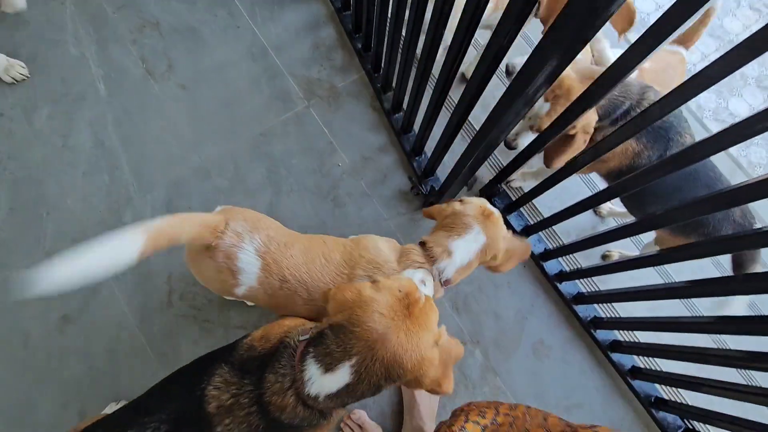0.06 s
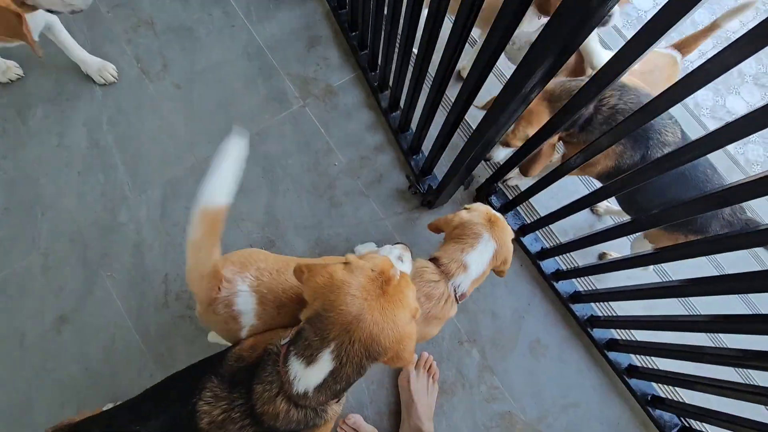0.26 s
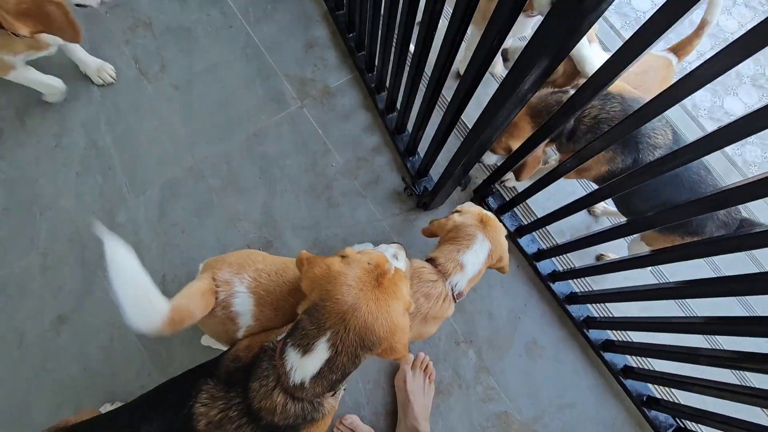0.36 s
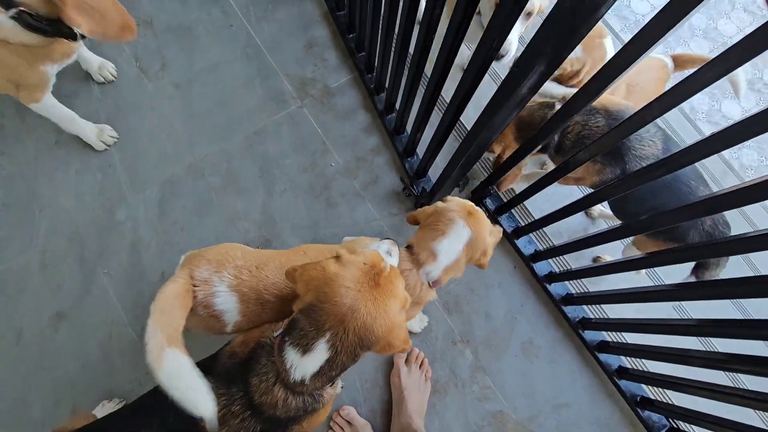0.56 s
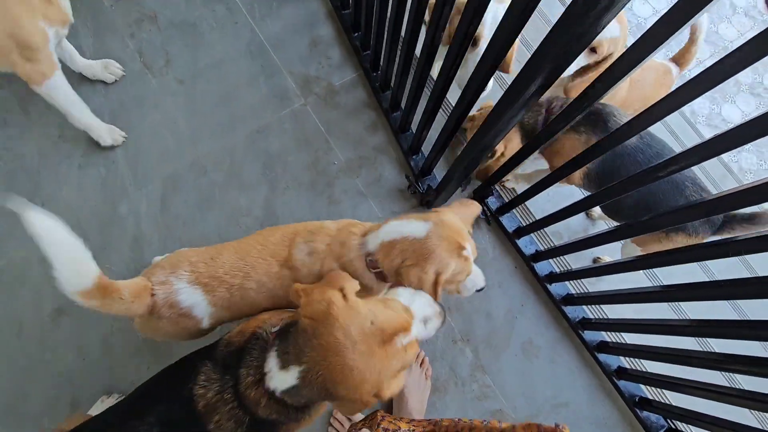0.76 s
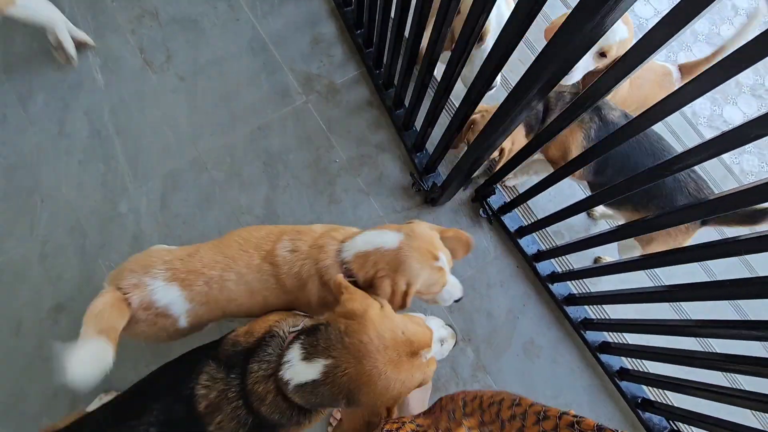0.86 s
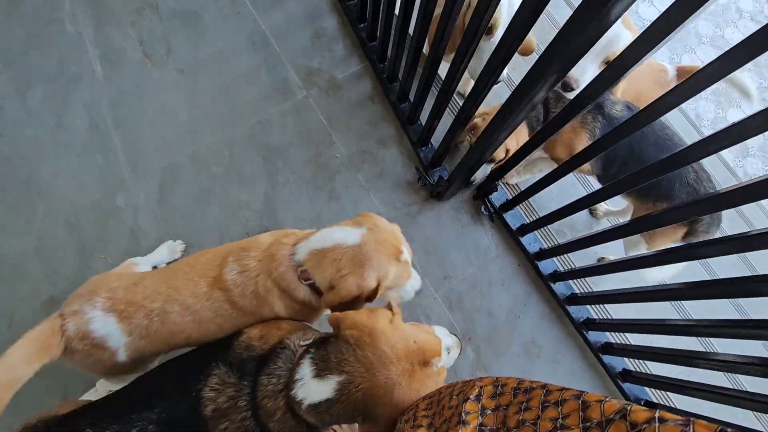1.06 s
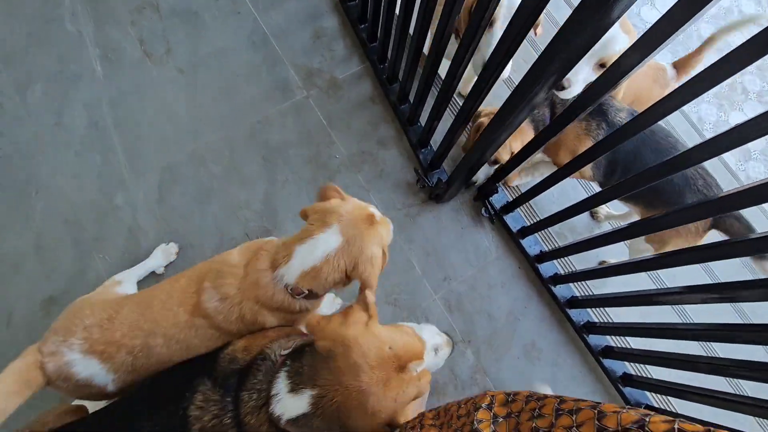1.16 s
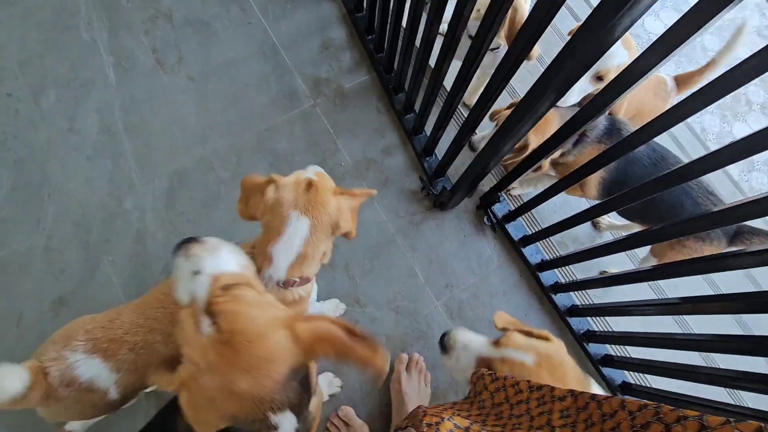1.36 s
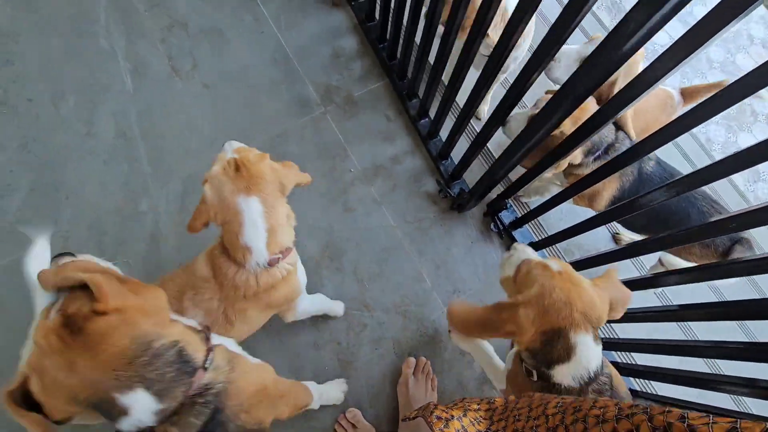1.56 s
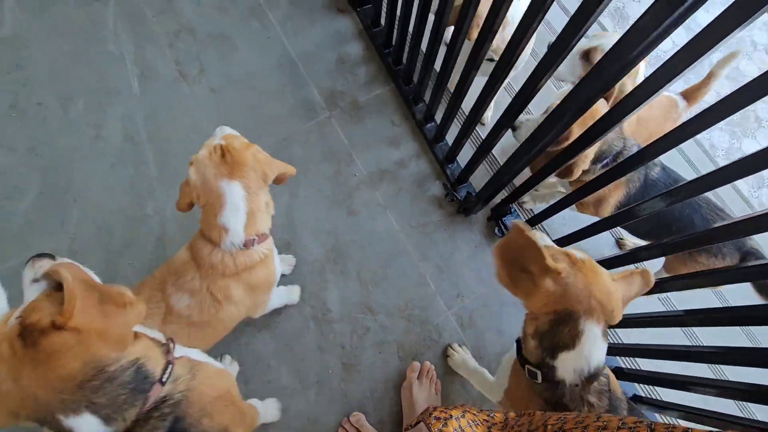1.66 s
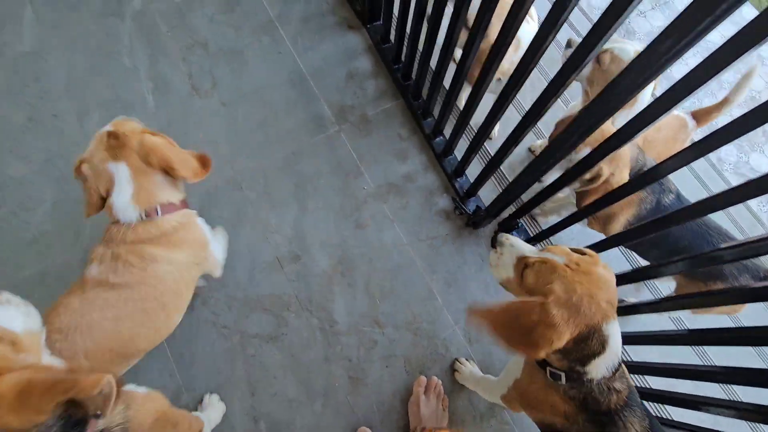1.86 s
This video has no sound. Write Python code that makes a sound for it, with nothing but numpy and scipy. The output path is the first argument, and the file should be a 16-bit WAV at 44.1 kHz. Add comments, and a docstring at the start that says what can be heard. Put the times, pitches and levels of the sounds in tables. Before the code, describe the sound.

Dogs bark twice and break into a long, high, falling howl on an echoing balcony

```python
"""Beagles crowd at a steel railing on a hard-walled balcony, close below the microphone.
A harsh bark topped by a yip, low grumbles and a second bark clearing into a hoot lead to a cracking howl and a yelp.
Each call is a stack of unsteady harmonics plus puffs of breath, coloured by a throat curve.
Claws are short noise bursts, paw thuds and railing bars are damped sines, and the air is steady noise.
The walls answer with decaying noise that differs between left and right."""
import sys
import numpy as np
from scipy import signal
from scipy.fft import rfft, irfft, next_fast_len
from scipy.io import wavfile
from scipy.ndimage import uniform_filter1d, minimum_filter1d, map_coordinates

SR = 44100
rng = np.random.default_rng(int(sys.argv[2]) if len(sys.argv) > 2 else 0)


def digitize_waveform(pressure):
    """Quantize a signal to 16-bit integers and store it at the path in sys.argv[1].

    Rows of a 2-D input are taken as channels; values are limited to [-1, 1].
    """
    field = np.atleast_2d(pressure).T
    bounded = np.clip(field, -1, 1)
    quanta = np.round(bounded * 32767).astype(np.int16)
    wavfile.write(sys.argv[1], SR, quanta)


N = 83790

# Source levels are ahead of the wall mix; colour curves are relative; roughness above 1 counts as 1.
# claw scuffs: start_s, level_db, t60_s
SCUFFS = [(.002, -32, 0.27), (1.189, -39, 0.097), (1.37, -32, 0.07), (1.763, -39, 0.14), (1.874, -35, 0.33)]
# tone of the scuffs: freq_hz, gain_db
SCUFF_COLOUR = [(100, -10.5), (1200, -3.5), (2000, 6.5), (3000, -6.5), (9000, -16), (15000, -24)]
# sharp claw clicks on the floor: start_s, level_db, t60_s
CLICKS = [(.115, -27.5, 0.097), (.164, -30.5, 0.14)]
# tone of the clicks: freq_hz, gain_db
CLICK_COLOUR = [(1500, 7), (15000, -13.5)]
# three low grumbles, each a contour: time_s, pitch_hz, level_db, roughness_0_to_1
GRUMBLES = [
    [(.02, 273.6, -43.5, 0.6), (.1, 334.5, -36.5, 0.2), (.14, 276, -26, .2)],
    [(.11, 185.3, -44.5, 0), (.15, 190.5, -23, 0.31), (.3, 176.3, -46.5, 0.4)],
    [(.34, 408.8, -50.5, .1), (.4, 284, -46, .05), (.44, 256.5, -32, 0.11), (.485, 215.9, -46, 0.1),
     (.55, 297.3, -30.5, 0.15), (.61, 470, -37, .05)],
]
# throat colour of the grumbles: freq_hz, gain_db
GRUMBLE_THROAT = [(100, -25), (180, 0), (350, -3.5), (600, -12), (1000, -6), (2000, -49.5), (8000, -51)]
# paws landing: start_s, pitch_hz, level_db, t60_s
THUDS = [(.03, 129, -36.5, 0.21), (1.603, 104.5, -32, 0.16)]
# harsh bark, ahead of rattle, sputters and jaw: time_s, pitch_hz, level_db, roughness_0_to_1
BARK = [(.11, 479.5, -35.5, 1.11), (.165, 593.4, -10.5, 0.42), (.2, 605.1, -8, 0.43),
        (.232, 597.7, -9.5, 0.31), (.255, 591.3, -14, 0.6), (.365, 543.2, -25.5, 0.66),
        (.405, 522.2, -41.5, 0.31), (.44, 499, -61.5, 0.1)]
# throat colour of the bark: freq_hz, gain_db
BARK_THROAT = [(120, -31.5), (330, -23.5), (590, 7), (780, -3), (1000, -2.5), (1250, -24.5), (2000, -16),
               (2600, -32), (3400, -44.5), (8000, -54), (15000, -65)]
# sputters as the bark runs out of air: centre_s, boost_db
SPUTTERS = [(0.272, 9), (0.291, 8.5), (0.359, 8.5)]
# short high yip over the start of the bark: time_s, pitch_hz, level_db, roughness_0_to_1
YIP = [(.122, 1188, -29.5, 0.24), (.16, 1246, -14.5, 0.14), (.2, 1325, -24, 0.3)]
# second bark that clears into a hoot: time_s, pitch_hz, level_db, roughness_0_to_1
HOOT = [(.51, 532.5, -66, .9), (.54, 561, -22, 0.23), (.568, 572, -18, 0.91), (.615, 590, -9.5, .01),
        (.65, 593.4, -11.5, 0.02), (.69, 584.5, -33, 0.03), (.702, 565.9, -21, .02), (.732, 557.1, -18, 0),
        (.765, 536, -60, 0.2)]
# throat colour of the hoot: freq_hz, gain_db
HOOT_THROAT = [(150, -52), (400, -18.5), (590, 1.5), (730, -17), (900, -4.5), (1130, -28.5), (1550, -29),
               (1780, -11.5), (2050, -25.5), (2800, -47.5), (7500, -48.5), (15000, -55)]
# thin nasal squeak as the howl starts: time_s, pitch_hz, level_db, roughness_0_to_1
SQUEAK = [(.79, 5060, -74, 0.08), (.805, 5950, -38.5, 0), (.83, 6190, -63, 0.06)]
# nasal colour of the squeak: freq_hz, gain_db
SQUEAK_THROAT = [(3000, -49), (5500, -3), (11000, -13.5)]
# main tone of the howl, ahead of the treble curve: time_s, pitch_hz, level_db, roughness_0_to_1
HOWL = [(.805, 1044, -46, 0.02), (.832, 1201, -14.5, 0.02), (.885, 1235, -11.5, 0.04),
        (.915, 1163, -18, 0.02), (.972, 1354, -19.5, 0), (1.018, 1364, -25, 0.05), (1.036, 1344, -11, 0),
        (1.09, 1330, -16.5, 0.02), (1.13, 1311, -15.5, 0), (1.175, 1278, -12, 0), (1.24, 1270, -11, 0),
        (1.295, 1263, -13, 0), (1.322, 1238, -17.5, 0), (1.335, 1215, -9.5, 0), (1.395, 1195, -9, 0),
        (1.43, 1195, -29, 0.02), (1.483, 1167, -11, .02), (1.57, 1116, -41, 0.03)]
# lower second tone where the howl cracks: time_s, pitch_hz, level_db, roughness_0_to_1
CRACK = [(1.398, 1108, -50.5, 0.13), (1.414, 1082, -19, 0.05), (1.48, 1061, -22, 0.1),
         (1.587, 919.6, -28.5, .12)]
# throat colour of the howl, shared by the yip: freq_hz, gain_db
HOWL_THROAT = [(300, -23.5), (800, -3), (1050, 0), (1380, -1.5), (1500, -25), (2150, 2.5), (2500, -24),
               (2750, -18.5), (3550, -44), (4000, -36), (4950, -56), (5350, -35.5), (5900, -46),
               (8800, -52.5), (10000, -44), (12500, -63.5)]
# rise and fall of the howl's treble and hiss: time_s, gain_db
HOWL_TREBLE = [(0.901, 3.5), (1.111, 5), (1.252, -5), (1.391, 1.5)]
# tone of the howl's breath hiss: freq_hz, gain_db
HISS_COLOUR = [(2500, -33), (4500, -4.5), (15000, -10.5)]
# nudged railing bars: start_s, pitch_hz, level_db, t60_s
BARS = [(.843, 999, -38, 0.94), (1.225, 1041, -41.5, 1)]
# closing yelp: time_s, pitch_hz, level_db, roughness_0_to_1
YELP = [(1.568, 944, -42.5, 0), (1.588, 844.5, -14.5, 0.13), (1.612, 749, -18.5, 0.42),
        (1.635, 701, -30.5, 0.08), (1.67, 690, -59, 0.6)]
# throat colour of the yelp: freq_hz, gain_db
YELP_THROAT = [(100, -15), (350, -26), (600, -19.5), (780, 3.5), (1050, -13), (1500, -24.5), (2200, -33.5),
               (3500, -41), (8000, -44.5), (15000, -48)]
# tone of the outdoor air: freq_hz, gain_db
AIR_COLOUR = [(25, -13), (80, -0.5), (500, -11), (1500, -7), (10000, -26)]
# ring time of the walls: freq_hz, t60_s
WALL_RING = [(150, .42), (600, .36), (3000, 0.4), (10000, 0.49)]
# left-right likeness of wall ring and air: freq_hz, correlation_minus1_to_1
WALL_ALIKE = [(150, 0.95), (350, 0.71), (650, 0.0076), (1200, -0.5), (4000, 0.0048)]

TOP_HZ = 15650  # band limit
FLUTTER_DB, FLUTTER_RATE = 11.5, 13.1  # overtone swells (dB), knots per second
BLUR_RAD, BLUR_RATE = 0.16, 500  # phase scatter per order above the third (radians), knots per second
RELEASE_S = 0.0011  # closing fade of every call
MOUTH_OPEN_S, MOUTH_WIDTH_S = 0.19, 0.048  # the bark is brightest when the jaws are widest
MOUTH_DB, MOUTH_HZ = 13, 1140  # treble boost at the widest point, and where it begins
RATTLE_HZ, RATTLE_DEPTH, RATTLE_SCATTER = 100.18, 0.3, 0.055  # mean rate, gain swing, share of the rate
SPUTTER_S = 0.0062  # from centre to 1/e of the boost in dB
TREBLE_HZ = 3200  # lower edge of the howl's treble
HISS_DB = -42.5  # hiss against the howl's loudness, ahead of the treble curve
SCUFF_RISE_S = 0.00067
AIR_DB = -51
LIMIT, LIMIT_HOLD_S = 0.88, 0.004  # peak ceiling (1 is full scale), gain smoothing time


def amp(db):
    """Decibels to gain."""
    return 10 ** (np.asarray(db) / 20)


def unit(x):
    """Scale to rms 1."""
    return x / np.sqrt(np.mean(x ** 2) + 1e-20)


def along(points, hz):
    """Read a frequency curve on a log axis."""
    f, v = np.transpose(points)
    return np.interp(np.log(hz + 1), np.log(f + 1), v)


def wobble(t, rate):
    """A smooth random curve over the times t, rate knots a second."""
    knots = rng.standard_normal(size=1024)
    return map_coordinates(knots, [(t - t[0]) * rate], order=2, mode="mirror")


def filtered(x, response):
    """Shape x by a response of frequency."""
    m = next_fast_len(x.shape[-1] + SR // 20, True)  # padded so the end does not wrap round
    spectrum = rfft(x, m) * response(np.fft.rfftfreq(m, 1 / SR))
    return irfft(spectrum, m)[..., :x.shape[-1]]


def noise(colour):
    """Coloured noise of rms 1."""
    return unit(filtered(rng.standard_normal(N), lambda hz: amp(along(colour, hz))))


def spread(pair):
    """Mix two unrelated signals into mid and side so that left-right likeness follows WALL_ALIKE."""
    def mid_side_gains(hz):
        turn = np.arccos(np.clip(along(WALL_ALIKE, hz), -1, 1)) / 2
        return np.array([np.cos(turn), np.sin(turn)])

    mid, side = filtered(pair, mid_side_gains)
    return np.array([mid + side, mid - side])


def balcony(x, wet_db, pan_db, lag_ms):
    """Direct sound, lag_ms later and pan_db louder at left than right, plus the decaying ring of the walls."""
    hz, t, bins = signal.stft(rng.standard_normal((2, SR * 3 // 4)), SR, nperseg=256)
    decay = amp(-60 * t / along(WALL_RING, hz)[:, None])
    tail = spread(signal.istft(bins * decay, SR, nperseg=256)[1])
    tail = np.pad(tail, ((0, 0), (150, 0)))  # the first wall answers 150 samples late
    wet = signal.fftconvolve(x[None], tail, axes=1)[:, :N]
    wet *= x.std() / wet.std(axis=1, keepdims=True)
    direct = filtered(x, lambda f: np.exp(np.outer([-1j, 1j], np.pi * f * lag_ms / 1000)))
    mix = (direct + amp(wet_db) * wet) / np.hypot(1, amp(wet_db))
    return mix * amp([[pan_db / 2], [-pan_db / 2]])


def voice(rows, throat, jitter, jitter_rate, shimmer_db, breath):
    """Vocal folds: harmonics on an unsteady pitch and a puff of turbulence each cycle, shaped by the throat."""
    s, *columns = np.transpose(rows)
    start, end = np.clip([int(s[0] * SR), int(s[-1] * SR)], 0, N)
    t = np.arange(start, end) / SR
    pitch, level, rough = [np.interp(t, s, column) for column in columns]
    rough = np.clip(rough, 0, 1)
    pitch = pitch * (1 + jitter * np.sqrt(rough) * wobble(t, jitter_rate))
    phase = 2 * np.pi * np.cumsum(pitch) / SR

    # each overtone swells on its own, and the higher ones are fuzzier
    orders = np.arange(1, 13)[:, None]
    flutter = np.array([wobble(t, FLUTTER_RATE) for _ in orders]) * (1 - 1 / orders) ** 4
    blur = np.array([wobble(t, BLUR_RATE) for _ in orders]) * np.maximum(orders - 3, 0)
    gains = amp(along(throat, orders * pitch) + FLUTTER_DB * flutter)
    gains = gains * (orders * pitch < TOP_HZ)
    tone = (gains * np.sin(orders * phase + BLUR_RAD * blur)).sum(0)
    tone = tone / np.sqrt((gains ** 2).sum(0) / 2)  # steady power

    turbulence = rng.standard_normal(N)[start:end] * (1 + np.cos(phase)) ** 2
    puffs = unit(filtered(turbulence, lambda hz: amp(along(throat, hz))))
    share = np.clip(breath * rough, 0, 1)  # puffs' share of the power
    blend = np.sqrt(1 - share) * tone + np.sqrt(share) * puffs
    call = blend * amp(level + shimmer_db * np.sqrt(rough) * wobble(t, 178.2))
    fade = np.minimum((t[-1] - t) / RELEASE_S, 1)
    return np.pad(call * fade, (start, N - end))


def rings(rows, attack_s):
    """One damped sine mode for each touch, with a softened attack."""
    out = np.zeros(N)
    for s, hz, db, t60 in rows:
        t = np.maximum(np.arange(N) / SR - s, 0)
        out += amp(db - 60 * t / t60) * np.sin(2 * np.pi * hz * t) * (1 - np.exp(-t / attack_s))
    return out


def outdoor_air():
    """Steady coloured noise as a diffuse stereo field."""
    return amp(AIR_DB) * spread(np.array([noise(AIR_COLOUR), noise(AIR_COLOUR)]))


def claws(rows, colour):
    """Claws meet the floor in short dying bursts of grainy noise."""
    t = np.arange(N) / SR
    envelope = np.zeros(N)
    for s, db, t60 in rows:
        rise = np.clip((t - s) / SCUFF_RISE_S, 0, 1)
        envelope += rise * amp(db - 60 * np.abs(t - s) / t60)
    return envelope * noise(colour) * amp(0.63 * wobble(t, 400))


def grumbles():
    """Low throaty calls whose roughness sets their share of breath."""
    return sum(voice(rows, GRUMBLE_THROAT, jitter=0.028, jitter_rate=120, shimmer_db=2, breath=1.0)
               for rows in GRUMBLES)


def paw_thuds():
    """Landing paws excite low, damped floor modes."""
    return rings(THUDS, attack_s=0.0045)


def bark():
    """Loose throat tissue chops a sputtering bark whose upper resonances swell as the jaws open."""
    t = np.arange(N) / SR
    x = voice(BARK, BARK_THROAT, jitter=0.04, jitter_rate=300, shimmer_db=1.5, breath=1.0)
    rattle_rate = RATTLE_HZ * (1 + RATTLE_SCATTER * wobble(t, 60))
    rattle = np.cos(2 * np.pi * np.cumsum(rattle_rate) / SR)
    sputter_db = sum(db * np.exp(-((t - s) / SPUTTER_S) ** 2) for s, db in SPUTTERS)
    x = x * (1 + RATTLE_DEPTH * rattle) * amp(sputter_db)
    upper = filtered(x, lambda hz: hz ** 6 / (hz ** 6 + MOUTH_HZ ** 6))
    opening = np.exp(-((t - MOUTH_OPEN_S) / MOUTH_WIDTH_S) ** 2)
    return x + upper * (amp(MOUTH_DB * opening) - 1)


def yip():
    """Short high harmonics with a partly breathy edge."""
    return voice(YIP, HOWL_THROAT, jitter=0.12, jitter_rate=230, shimmer_db=-6, breath=0.46)


def hoot():
    """A rough bark onset that steadies into clear harmonics."""
    return voice(HOOT, HOOT_THROAT, jitter=0.031, jitter_rate=130, shimmer_db=-1, breath=1.0)


def squeak():
    """A thin, very high nasal tone."""
    return voice(SQUEAK, SQUEAK_THROAT, jitter=0.37, jitter_rate=130, shimmer_db=8.0, breath=1.0)


def howl():
    """A near-pure tone that splits in two; its overtones and breath hiss come and go together."""
    x = sum(voice(rows, HOWL_THROAT, jitter=0.072, jitter_rate=180, shimmer_db=-1.5, breath=0.11)
            for rows in (HOWL, CRACK))
    loudness = np.sqrt(np.abs(uniform_filter1d(x ** 2, size=SR // 20)))
    hiss = amp(HISS_DB) * loudness * noise(HISS_COLOUR)
    treble = filtered(x, lambda hz: hz > TREBLE_HZ)
    treble_gain = amp(np.interp(np.arange(N) / SR, *np.transpose(HOWL_TREBLE)))
    return x - treble + treble_gain * (treble + hiss)


def railing_bars():
    """Nudged steel bars ring faintly as damped modes."""
    return rings(BARS, attack_s=0.0012)


def yelp():
    """A falling tone made rough by unsteady pitch, level and breath."""
    return voice(YELP, YELP_THROAT, jitter=0.0774, jitter_rate=218, shimmer_db=7.5, breath=0.26)


def scene():
    """Place the dogs, claws and paws among the walls, then add the dry railing and the outdoor air."""
    barker = bark() + yip() + claws(SCUFFS, SCUFF_COLOUR)
    clicks = claws(CLICKS, CLICK_COLOUR)
    howler = howl() + squeak() + yelp()
    low = grumbles() + paw_thuds()
    return (balcony(barker, wet_db=1, pan_db=1, lag_ms=-0.033)
            + balcony(clicks, wet_db=-2, pan_db=-1, lag_ms=0)
            + balcony(hoot(), wet_db=-4, pan_db=3, lag_ms=-0.045)
            + balcony(howler, wet_db=0.5, pan_db=3, lag_ms=-0.23)
            + balcony(low, wet_db=-14.5, pan_db=1.5, lag_ms=0)
            + railing_bars()
            + outdoor_air())


def record(dry):
    """A fast limiter holds the loudest peaks, and nothing is kept above the band limit."""
    size = int(LIMIT_HOLD_S * SR)
    needed = LIMIT / np.maximum(np.abs(dry).max(axis=0), LIMIT)
    gain = uniform_filter1d(minimum_filter1d(needed, 2 * size), size)
    return filtered(dry * gain, lambda hz: hz < TOP_HZ)


dry = scene()
out = record(dry)
digitize_waveform(out)
```